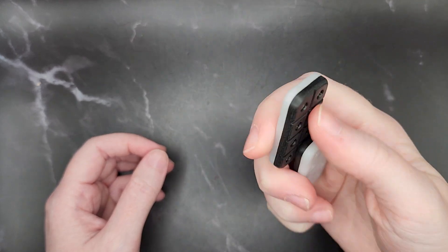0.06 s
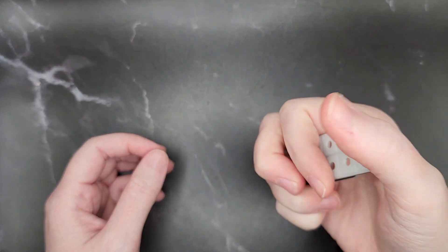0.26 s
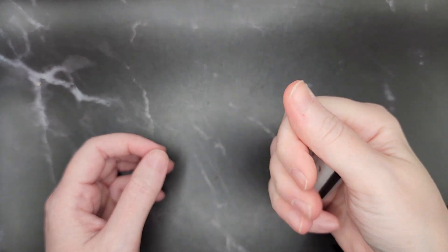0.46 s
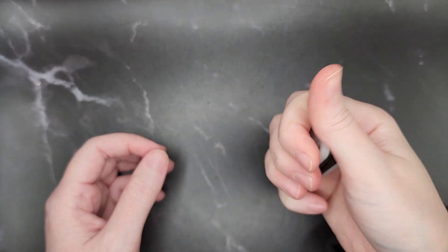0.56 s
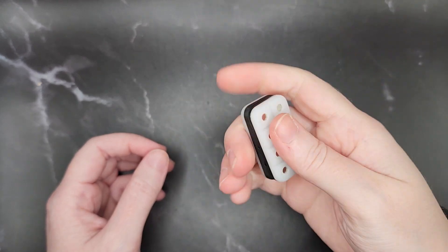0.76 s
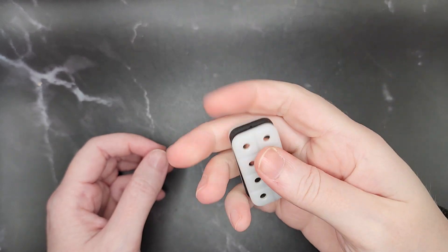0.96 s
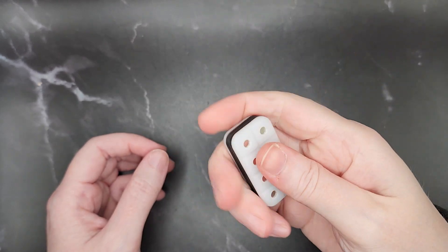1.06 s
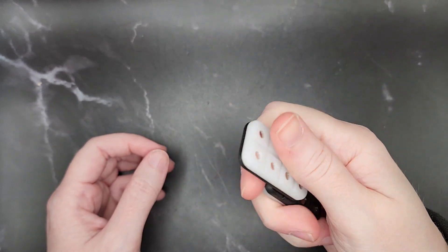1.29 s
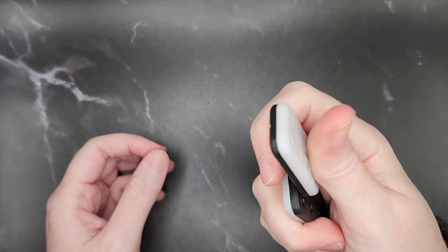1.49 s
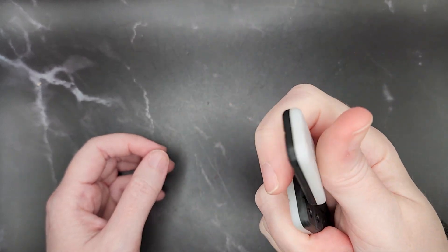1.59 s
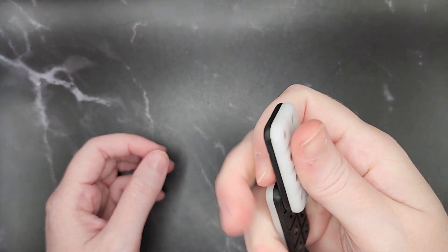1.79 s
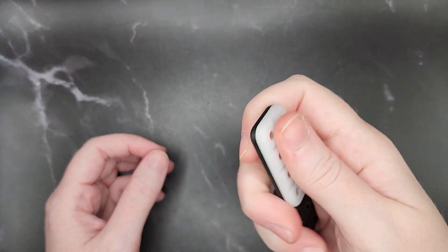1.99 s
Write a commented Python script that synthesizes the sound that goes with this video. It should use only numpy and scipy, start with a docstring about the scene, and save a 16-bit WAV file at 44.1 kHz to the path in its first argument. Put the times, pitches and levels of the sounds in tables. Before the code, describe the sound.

Close up in a small room, a magnetic slider clacks hard against its stops three times, then its loose plate ticks softly under rubbing fingers, mostly to the left, above quiet low ventilation hum.

```python
"""Throughout: low steady hum and ventilation, as sines and shaped noise, in a small room.
First a magnetic fidget slider snaps into its stops three times, in one hand above a desk.
Then it only taps softly, its skin rub (noise with a drawn level) faint, as the fingers turn it.
Each contact is a scrape, a click and chatter that ring the shell, scatter off hand and desk, and die in the room."""
import sys
import numpy as np
from scipy import signal
from scipy.fft import rfft, irfft
from scipy.io import wavfile

SR = 44100
rng = np.random.default_rng(int(sys.argv[2]) if len(sys.argv) > 2 else 0)


def store_pcm(level_fs):
    """Save levels as 16-bit WAV."""
    pcm = np.round(np.clip(level_fs, -1, 1) * 32767).astype(np.int16)
    wavfile.write(sys.argv[1], SR, np.atleast_2d(pcm).T)


N = 90404
TIME_S = np.arange(N) / SR


def from_db(db):
    """Decibels to amplitude gain."""
    return 10 ** (np.asarray(db) / 20)


def rms_one(x):
    """Scale to rms 1."""
    return x / np.sqrt(np.mean(x ** 2) + 1e-20)


def at_hz(points, hz, column=1):
    """Interpolate a table column on a log-frequency axis."""
    table = np.array(points)
    log_hz = np.log(np.maximum(hz, 1))
    return np.interp(log_hz, np.log(table[:, 0]), table[:, column])


def cut(x, hz, kind, order=2):
    """Butterworth filter."""
    edge_hz = np.clip(hz, 10, .47 * SR)
    sos = signal.butter(order, edge_hz, kind, fs=SR, output="sos")
    return signal.sosfilt(sos, x + 1e-18)


def panned(left_right_db):
    """Left and right gains of constant total power."""
    gains = from_db([[left_right_db / 2], [-left_right_db / 2]])
    return gains / np.sqrt(np.sum(gains ** 2))


def noise(gain_at):
    """Gaussian noise shaped by gain_at(hz), in amplitude per root Hz."""
    spectrum = rfft(rng.standard_normal(N)) * gain_at(np.fft.rfftfreq(N, 1 / SR))
    return irfft(spectrum, N) * np.sqrt(SR / 2)


def drift(rate_hz):
    """Slow random signal of rms 1: low-passed noise."""
    return rms_one(noise(lambda hz: 1 / (1 + (hz / rate_hz) ** 2)))


# Ventilation rumble and hiss: centre_hz, density_db_per_hz
AIR_SLOPE = [(15, -92.5), (28, -79.5), (45, -73), (100, -76.5), (145, -72.5), (230, -77), (290, -87),
             (400, -84), (590, -87), (750, -92.5), (1450, -96), (2200, -107), (4000, -116), (7500, -123),
             (10000, -136), (13000, -131)]
# Resonances of the moving air: centre_hz, width_hz, level_db_rms
AIR_RESONANCES = [(40.2, 2.7, -65), (188, 14, -63), (232, 20, -66), (488, 5, -75.5), (995, 160, -70.5),
                  (1438, 120, -72)]


def air_power(hz):
    """Ventilation power per Hz: a broad slope plus Gaussian resonances."""
    power = from_db(at_hz(AIR_SLOPE, hz)) ** 2
    for centre_hz, width_hz, level_db in AIR_RESONANCES:
        peak = from_db(level_db) ** 2 / width_hz
        power = power + peak * np.exp(-np.pi * ((hz - centre_hz) / width_hz) ** 2)
    return power


# Machine hum partials: pitch_hz, level_db_rms
HUM_PARTIALS = [(58.5, -51), (120, -70), (163, -60), (285, -73.5), (348, -67.5), (570.6, -71)]
HUM_WAVER_DB, HUM_WAVER_HZ = .5, 3
# Likeness of the air noise at the two ears: centre_hz, left_right_correlation
AIR_CORRELATION = [(60, 0.97), (140, 0.99), (300, 0.67), (700, 0.17), (3000, 0.19), (12000, 0.039)]
# Background balance: centre_hz, left_right_db
BACKGROUND_BALANCE = [(60, -0.28), (160, 3.5), (330, -1.5), (700, -1.5), (3000, 0.5)]
LEFT_LEAD_S = .00015


def background():
    """Hum sines in mid/side air noise: alike at both ears in the bass, earlier on the left."""
    hum = 0
    for pitch_hz, level_db in HUM_PARTIALS:
        level = from_db(level_db + HUM_WAVER_DB * drift(HUM_WAVER_HZ))
        hum = hum + level * np.sqrt(2) * np.sin(2 * np.pi * (pitch_hz * TIME_S + rng.random()))

    def air(sign):
        """Shared (+1) or opposed (-1) part of the air noise."""
        def gain_at(hz):
            """Split the power by the correlation of the ears."""
            likeness = np.clip(at_hz(AIR_CORRELATION, hz), -1, 1)
            return np.sqrt(air_power(hz) * (1 + sign * likeness) / 2)
        return noise(gain_at)

    ears = np.array([[1], [-1]])
    both = hum + air(1) + air(-1) * ears
    hz = np.fft.rfftfreq(2 * N, 1 / SR)
    balance = from_db(ears * at_hz(BACKGROUND_BALANCE, hz) / 2)
    lead = np.exp(1j * np.pi * hz * LEFT_LEAD_S * ears)
    mirrored = np.hstack([both, both[:, ::-1]])  # no jump where the FFT wraps round
    return irfft(rfft(mirrored) * balance * lead)[:, :N]


TAP_PAN_DB = 17.5  # left-right, also of the rub
# Skin on the shell: time_s, level_db (before drift)
RUB_LEVEL = [(0.53, -99), (.65, -77), (1.0, -85.5), (1.15, -70.5), (1.3, -72), (1.45, -81), (1.55, -99),
             (1.78, -71.5), (1.87, -86), (2.04, -74)]
# Rub spectrum: centre_hz, relative_density_db_per_hz
RUB_SPECTRUM = [(800, -13), (2800, 5), (7000, -3.5), (10000, -18), (13500, -9.5)]


def fingers():
    """Skin friction on the turning shell: coloured noise with a drifting level."""
    level_db = np.interp(TIME_S, *np.transpose(RUB_LEVEL)) + 3.5 * drift(25)
    friction = rms_one(noise(lambda hz: from_db(at_hz(RUB_SPECTRUM, hz))))
    return panned(TAP_PAN_DB) * from_db(level_db) * friction


def scatter(t60_s, build_s):
    """Dense decaying echoes, different at each ear, of unit energy."""
    t = TIME_S[:SR // 2]
    envelope = from_db(-60 * t / t60_s) * (1 - np.exp(-(t / build_s) ** 2))
    echoes = rng.standard_normal((2, len(t))) * envelope
    return echoes / np.sqrt(np.sum(echoes ** 2, axis=1, keepdims=True))


def through(x, echoes):
    """Convolve a sound with a pair of echo patterns."""
    return signal.fftconvolve(x[None], echoes, axes=1)[:, :N]


ROOM_DB, ROOM_PAN_DB, ROOM_BUILD_S = -6.5, -2.5, .008
# Room tail: centre_hz, relative_level_db, t60_s
ROOM_DECAY = [(698, 4.5, .33), (2100, 0.5, .31), (4367, 5.5, 0.21), (7600, 0.5, 0.24), (10500, -6.5, 0.15),
              (15000, -3, 0.17)]


def room(x):
    """Short tail in nine bands; the treble broadly dies sooner."""
    edges_hz = np.geomspace(400, 18000, 10)
    tail = 0
    for low_hz, high_hz in zip(edges_hz, edges_hz[1:]):
        centre_hz = np.sqrt(low_hz * high_hz)
        echoes = scatter(at_hz(ROOM_DECAY, centre_hz, column=2), ROOM_BUILD_S)
        tail = tail + from_db(at_hz(ROOM_DECAY, centre_hz)) * cut(echoes, [low_hz, high_hz], "band")
    return from_db(ROOM_DB) * panned(ROOM_PAN_DB) * through(x, tail)


DESK_DB, DESK_T60_S, DESK_BUILD_S, DESK_PAN_SHARE = -0.5, .034, 0.00058, .65


def at_desk(sound, pan_db):
    """Direct sound plus scatter off hand and desk, drawn anew for each contact."""
    near = through(sound, scatter(DESK_T60_S, DESK_BUILD_S))
    return panned(pan_db) * sound + from_db(DESK_DB) * panned(DESK_PAN_SHARE * pan_db) * near


HOLLOW_Q, GRIP_ROOM_SHARE = 3.0, .3  # share of the boost in dB that reaches the room


def in_hand(sound, hollow_hz, hollow_db, pan_db):
    """Grip cavity resonance, stronger ahead: (near sound, sound sent into the room)."""
    hollow = signal.lfilter(*signal.iirpeak(hollow_hz, HOLLOW_Q, fs=SR), sound)
    boost_db = [[hollow_db], [GRIP_ROOM_SHARE * hollow_db]]
    ahead, around = sound + (from_db(boost_db) - 1) * hollow
    return at_desk(ahead, pan_db), around


def ring(force, hz, t60_s):
    """Damped resonator: a unit click starts a cosine of height 1."""
    r = from_db(-60 / (t60_s * SR))
    w = 2 * np.pi * hz / SR
    return signal.lfilter([1, -r * np.cos(w)], [1, -2 * r * np.cos(w), r * r], force + 1e-18)


# Shell modes: pitch_hz, relative_level_db, t60_s
SHELL_MODES = [(1000, -50, 0.0096), (1533, -32, .028), (1933, -26, 0.016), (3040, -35, 0.0083),
               (3367, -24.5, 0.022), (4197, -38.5, 0.008), (4460, -35, .015), (6120, -25.5, 0.0073),
               (6490, -17.5, 0.0088), (7530, -14.5, 0.0086), (9390, -22, 0.0053), (11980, -15.5, 0.0073),
               (13640, -14, 0.024), (15510, -18, 0.021)]
SHELL_DB, SHELL_ROOM_SHARE = -8.5, 0.14  # share is an amplitude gain
CHATTER_DB, CHATTER_S = -10, 0.0014  # the faces rattle as they settle
SCRAPE_RISE_S, SCRAPE_GRAIN_DB, SCRAPE_DB = 0.0057, 5.5, -10.5  # magnets pull the plate ever faster
CRACK_DB, CRACK_LOW_HZ = -3, 2270  # the bare contact
BODY_LOW_HZ = 1196  # the shell is too small to radiate bass


def contact(start_s, scrape_db):
    """Swelling scrape, blow and chatter ring the shell: (sound ahead, sound all around)."""
    start = int(start_s * SR)
    age_s = (np.arange(N) - start) / SR
    grain_level = from_db(SCRAPE_GRAIN_DB * rng.standard_normal(N))
    grains = rms_one(rng.standard_normal(N) * grain_level)
    scrape = from_db(SCRAPE_DB + scrape_db) * np.exp(-np.minimum(abs(age_s) / SCRAPE_RISE_S, 20))
    chatter = from_db(CHATTER_DB) * np.exp(-np.minimum(abs(age_s) / CHATTER_S, 20))
    force = grains * np.where(age_s < 0, scrape, chatter)
    force[start] = 1  # the blow
    shell = sum(from_db(SHELL_DB + db) * ring(force, hz, t60_s) for hz, db, t60_s in SHELL_MODES)
    crack = from_db(CRACK_DB) * cut(force, CRACK_LOW_HZ, "high", order=1)
    return cut(crack + np.outer([1, SHELL_ROOM_SHARE], shell), BODY_LOW_HZ, "high")


# Loose plate on its track:
# start_s, level_db, hollow_hz, hollow_boost_db, low_pass_hz, relative_scrape_db
TAP_EVENTS = [(1.0637, -42.5, 6330, 6.5, 5430, -22), (1.0850, -57, 6360, 9, 6000, -30),
              (1.1775, -24.5, 5240, 8, 5740, -19), (1.2269, -28, 3330, 12.5, 6300, -12),
              (1.3293, -35, 3460, 18, 3040, -27), (1.3946, -40.5, 2560, 12.5, 5760, -1.5),
              (1.6738, -28.5, 3250, 13, 2887, -8), (1.68, -44.5, 4160, 10, 8400, -21),
              (2.0432, -18, 5620, 9.5, 3260, -13)]


def taps():
    """Loose plate taps its track: contacts dulled by a low-pass."""
    for start_s, level_db, hollow_hz, hollow_db, dull_hz, scrape_db in TAP_EVENTS:
        sound = from_db(level_db) * contact(start_s, scrape_db)
        yield in_hand(cut(sound, dull_hz, "low"), hollow_hz, hollow_db, TAP_PAN_DB)


TREBLE_HZ = 9650
# Plate hits a stop:
# start_s, level_db, left_right_db, hollow_hz, hollow_boost_db, treble_db, relative_scrape_db
SNAP_EVENTS = [(0.2193, -14, 15, 4200, 2, 4, -2), (.2236, -8, 31, 4130, 3, 15.5, -27.5),
               (.2248, -3.5, -18.5, 4600, 5.5, 5, -36.5), (.3330, -2.5, 12.5, 3030, 10, -2, -15),
               (.3782, -21.5, 17, 5100, 18, -18, -21.5), (.3803, -13, 15.5, 4950, 16.5, 0, -25.5)]


def snaps():
    """Plate hits the stops: hard contacts, each with its own direction and treble shelf."""
    for start_s, level_db, pan_db, hollow_hz, hollow_db, treble_db, scrape_db in SNAP_EVENTS:
        sound = from_db(level_db) * contact(start_s, scrape_db)
        treble = cut(sound, TREBLE_HZ, "high", order=1)
        shelved = sound + (from_db(treble_db) - 1) * treble
        yield in_hand(shelved, hollow_hz, hollow_db, pan_db)


def scene():
    """Sum of background, finger rub, near contacts and their room tail."""
    near, around = zip(*snaps(), *taps())
    return background() + fingers() + room(sum(around)) + sum(near)


CUTOFF_HZ = 15950


def record(dry):
    """Clip at full scale, then a steep zero-phase low-pass."""
    low_pass = signal.butter(20, CUTOFF_HZ, fs=SR, output="sos")
    return signal.sosfiltfilt(low_pass, np.clip(dry, -1, 1))


dry = scene()
out = record(dry)
store_pcm(out)
```